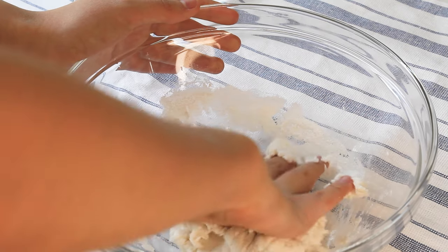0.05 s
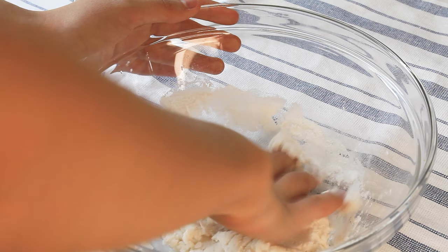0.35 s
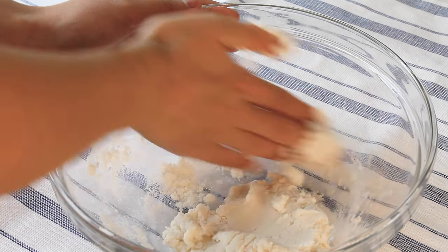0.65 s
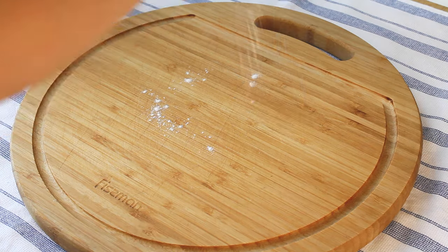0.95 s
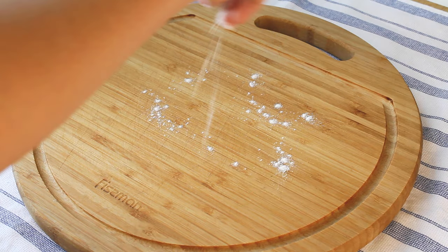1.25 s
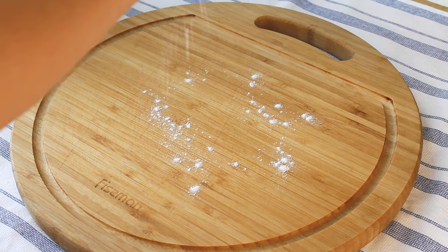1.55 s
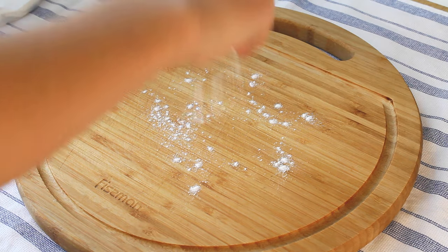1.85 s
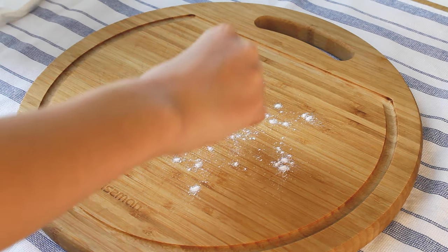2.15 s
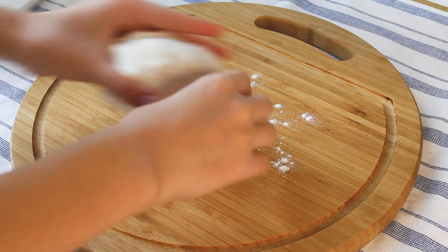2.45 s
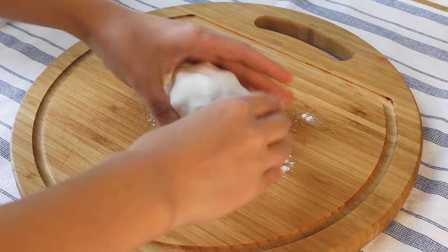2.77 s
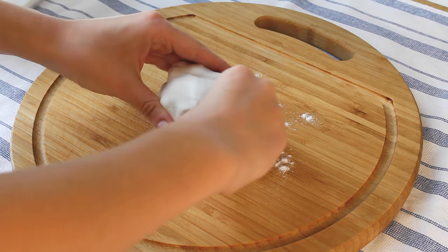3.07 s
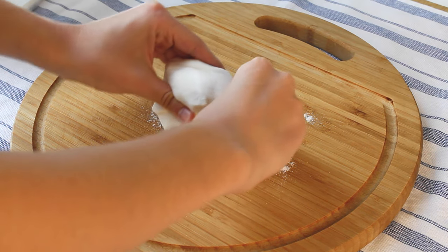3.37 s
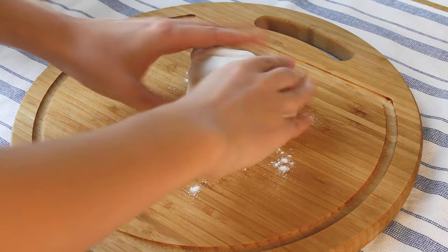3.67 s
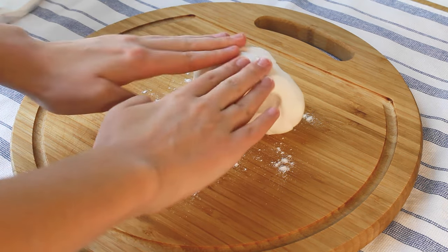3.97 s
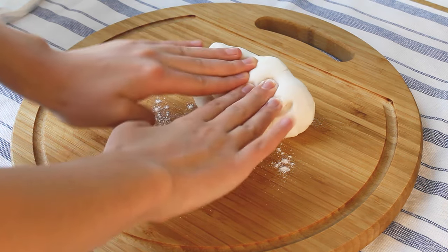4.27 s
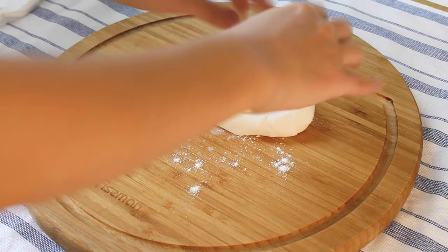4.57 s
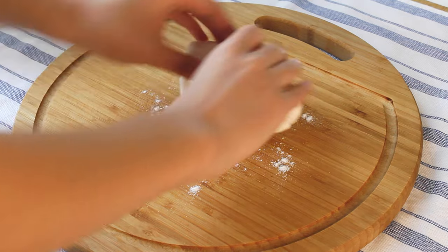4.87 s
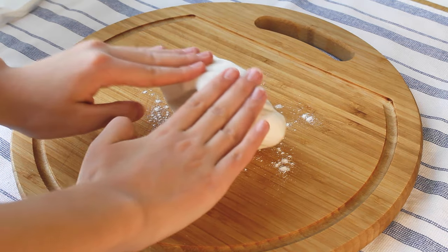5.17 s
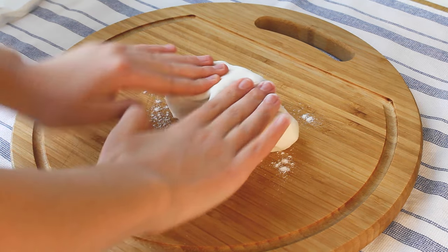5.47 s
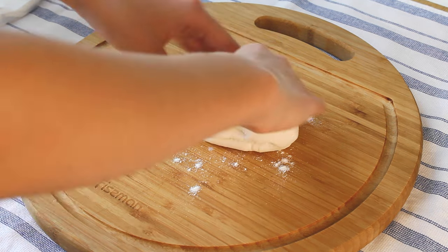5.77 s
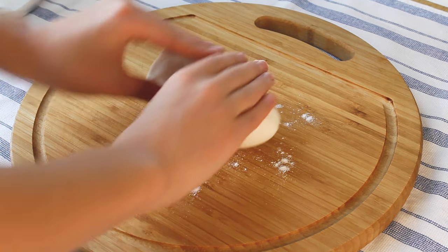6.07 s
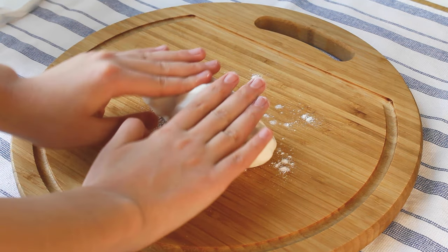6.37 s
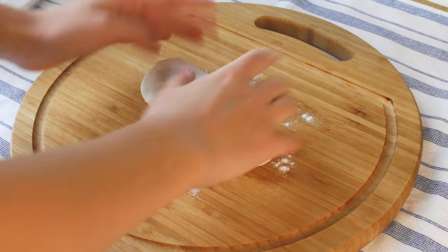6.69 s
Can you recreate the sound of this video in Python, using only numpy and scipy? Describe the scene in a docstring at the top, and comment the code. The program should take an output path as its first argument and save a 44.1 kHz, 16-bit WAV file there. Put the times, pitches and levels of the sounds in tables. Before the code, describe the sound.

A wooden cutting board knocks and rocks against a table as dough is rolled on it by hand, heard close up in a small kitchen. It begins with faint rubbing and pinches of flour, then a crisp knock and a soft plop of dough. Three pushes follow about a second apart, with wooden clatter and dull thuds. Floury palms brush and peel off the dough, ending quietly over a steady hum.

```python
"""In a quiet kitchen, flour is sprinkled on a round wooden board on a cloth-covered table,
then dough is rolled on it by hand. Each push tips the board, so it knocks on the table and chatters.
Arms and dough land with dull thuds, trapping little pockets of air that pop.
Floury palms hiss as they rub and peel off the dough, and a fingertip squeaks faintly.
The walls add a short echo, and the room hums underneath."""
import sys
import numpy as np
from scipy import signal
from scipy.fft import rfft, irfft
from scipy.io import wavfile

SR = 44100
rng = np.random.default_rng(int(sys.argv[2]) if len(sys.argv) > 2 else 0)


def store_wav(level_fs):
    """Save 16-bit WAV to argv[1]."""
    pcm = np.round(np.clip(np.atleast_2d(level_fs), -1, 1) * 32767)
    wavfile.write(sys.argv[1], SR, pcm.T.astype(np.int16))


N = 305613
TIME = np.arange(N) / SR

# The notes the board rings with. A ring time is how long a sound takes to fade by 60 dB.
# pitch_hz, level_db, ring_s
BOARD_NOTES = [(121, -24, .1), (170, -33, .16), (198, -25, .15), (252, -32, .15), (312, -20, .037),
               (377, -30.5, .16), (500, -21, .036), (648, -31, .1), (738, -30, .1), (806, -41, .13),
               (905, -18.5, .042), (1021, -29, .046), (1090, -37, .13), (1174, -21.5, .03),
               (1250, -26.5, .046), (1411, -36, .037), (1595, -33, .033), (1760, -24, .028),
               (2015, -34.5, .042), (2245, -33, .027), (2535, -41, .038), (2665, -38, .035),
               (2980, -41, .04), (3567, -47, .039), (4550, -48, .04)]
def board(bass_hz, smear_hz, smear_width_hz, spot_db, rim_s, rim_share):
    """Every touch rings the same notes in the wood; soft ones are dull, heavy ones add bass."""
    out, click = np.zeros(N), signal.unit_impulse(SR // 4)
    notes = np.array([from_db(db) * ring(click, hz, ring_s) for hz, db, ring_s in BOARD_NOTES])
    touches = contacts()
    # each spot on the board favours other notes
    spots = from_db(spot_db * rng.standard_normal((len(touches), len(BOARD_NOTES))))
    for (s, db, brightness_hz, weight_db, muting), spot in zip(touches, spots):
        wash = table_wash(len(click), db=-34.5, ring_s=0.33, low_hz=163, high_hz=1960)
        knock = cut(spot @ notes + wash, brightness_hz, "low") * from_db(-muting * TIME[:len(click)])
        bass = (from_db(weight_db) - 1) * cut(knock, bass_hz, "low", order=1)
        add(out, s, from_db(db) * (knock + bass))
    # waves cross the wood at unequal speeds, which smears the first crack
    r = np.exp(-np.pi * smear_width_hz / SR)
    smear = [1, -2 * r * np.cos(2 * np.pi * smear_hz / SR), r * r]
    out = signal.lfilter(smear[::-1], smear, out)
    # they bounce back from the rim in a few quick bursts
    loop = np.r_[1, np.zeros(round(rim_s * SR)), -rim_share]
    out = signal.lfilter(loop[::-1], loop, out)
    return cut(out, 82, "high")   # so small a board gives off little deep bass


# Single knocks of the board on the table. Harder is brighter; weight boosts the bass.
# start_s, level_db, brightness_hz, weight_db
KNOCKS = [(2.1728, 1, 2620, -12), (3.2033, -20, 348, 10.5), (3.317, -36, 597, 15.5),
          (4.2512, -14.5, 398, 5.5), (4.359, -18, 513, 8), (4.457, -19.5, 292, 5.5),
          (5.404, -11.5, 763, 4.5), (5.495, -17.5, 450, 7.5)]
# Pushes that tip the board and roll the dough.
# start_s, level_db, weight_db, bounces (rounded), roll_s
PUSHES = [(2.892, 1, -13.5, 3.95, 0.28), (4.1002, 0.5, -4, 2, 0.28), (5.177, -2, 2.5, 1, 0.13)]
def contacts(rock_s=.0392, bounce_loss_db=0.9, muting_db_per_s=500):
    """List every touch of the board: start_s, level_db, brightness_hz, weight_db, muting_db_per_s."""
    ringing = list(KNOCKS)
    for s, db, weight_db, bounces, _ in PUSHES:
        ringing.append((s, db, 1275, weight_db))
        ringing.append((s + 0.037, db - 12.5, 810, 7))   # the far edge comes down
        for k in range(round(bounces)):   # then the board rocks, softly and ever more weakly
            ringing.append((s + .052 + k * rock_s, db - 10 - k * bounce_loss_db, 437, 3))
    # whatever lands stays on the board and mutes it
    muted = [(s, db + 12.5, hz, -25, muting_db_per_s) for s, db, _, _, hz, _ in LANDINGS]
    return [(*touch, 0) for touch in ringing] + muted


def table_wash(size, db, ring_s, low_hz, high_hz):
    """The table top rings with so many notes at once that they blur into fading noise."""
    wash = cut(cut(rng.standard_normal(size), low_hz, "high"), high_hz, "low", order=4)
    return from_db(db) * fade(TIME[:size], ring_s) * rms_one(wash)


# An arm, lump of dough or palm lands flat and traps a pocket of air.
# start_s, level_db, pitch_hz, pocket_open_s, knock_brightness_hz, thud_db
LANDINGS = [(1.5719, -29, 363, .007, 2000, -10), (2.4659, -21, 353, 0.0074, 900, -6.5),
            (3.607, -41.5, 382, .025, 1300, -38)]
def air_pops(brightness_hz, ring_s, choke_db_per_s):
    """The trapped air rings for a moment, until its pocket closes."""
    out, push = np.zeros(N), cut(signal.unit_impulse(SR // 4), brightness_hz, "low")
    for s, db, hz, open_s, *_ in LANDINGS:
        choke = from_db(-choke_db_per_s * np.maximum(TIME[:len(push)] - open_s, 0))
        add(out, s, from_db(db) * choke * ring(push, hz, ring_s))
    return out


# The hands lean on the dough.
# start_s, level_db, last_pitch_hz, ring_s
PRESSES = [(1.854, -24, 51.5, .27), (2.772, -25.5, 55.6, 0.11), (3.312, -29, 45.3, 0.23),
           (3.553, -32, 57.6, 0.29), (4.365, -30, 62, 0.32), (4.624, -28.5, 62, 0.21),
           (5.409, -11.5, 93, 0.04), (5.498, -24.5, 102.5, 0.21), (5.673, -19.5, 57, .1),
           (5.735, -29.5, 59.7, 0.19), (6.301, -27, 52, 0.18), (6.39, -25, 46.3, 0.056)]
def thuds(rise_s, settle_s, sag_ratio, shake_hz, sway_hz, sway_ring_s, sway_db):
    """The table gives under a soft weight: the pitch sinks as it settles, and the top sways on."""
    out, t = np.zeros(N), TIME[:SR // 2]
    loads = [(s + 0.0146, db, 60.6, 32.26, 0.35) for s, *_, db in LANDINGS]
    loads += [(s, db, sag_ratio * hz, hz, ring_s) for s, db, hz, ring_s in PRESSES]
    loads += [(s, -29, sag_ratio * shake_hz, shake_hz, 1) for s, *_ in PUSHES]
    for s, db, first_hz, last_hz, ring_s in loads:
        hz = last_hz + (first_hz - last_hz) * np.exp(-(t / settle_s) ** 2)
        swell = (1 - np.exp(-t / rise_s)) * fade(t, ring_s)
        add(out, s, from_db(db) * swell * np.sin(2 * np.pi * np.cumsum(hz) / SR))
    sway = rms_one(ring(out, sway_hz, sway_ring_s))
    return out + from_db(sway_db) * np.std(out) * sway


def rolling(delay_s=.04, rise_share=0.15):
    """After a push the dough rumbles over the wood; a stronger push rumbles louder."""
    out = np.zeros(N)
    for s, db, *_, roll_s in PUSHES:
        rise_s = rise_share * roll_s
        add(out, s + delay_s, rub(db - 39.5, rise_s, roll_s - rise_s, low_hz=80, high_hz=363, peak_hz=178))
    return out


def scrape(start_s):
    """The dough breaks loose and drags back over the wood, hollow and grainy."""
    out = np.zeros(N)
    add(out, start_s, rub(db=-41.5, rise_s=.012, fall_s=0.073, low_hz=340, high_hz=2600, peak_hz=486))
    return out


# A hand brushes over wood or cloth; the hollow under it colours the sound.
# start_s, length_s, level_db, hollow_hz
BRUSHES = [(0.969, 0.15, -49, 1180), (1.19, 0.4, -57, 1930), (2.521, 0.053, -54.5, 1600),
           (4.735, .13, -60.5, 2260), (5.65, 0.084, -55.5, 2230), (5.712, .11, -52.5, 1700)]
# A palm peels off the dough.
# start_s, rise_s, fall_s, skin_db, flour_db, flour_hiss_hz
PEELS = [(2.357, .022, 0.057, -58, -50.5, 5400), (3.233, 0.044, 0.064, -57, -56, 6770),
         (4.362, 0.056, 0.026, -49.5, -52.5, 7000), (5.405, 0.043, 0.078, -55, -55.5, 11000),
         (6.029, 0.036, 0.08, -56, -60, 6150), (6.262, 0.078, 0.024, -50.5, -56, 6560),
         (6.583, 0.0017, 0.14, -54.5, -52, 4600), (6.895, 0.024, 0.018, -53.5, -64, 4500)]
# Sticky spots snap free.
# start_s, level_db, pitch_hz
TICKS = [(2.378, -43, 1800), (3.2734, -42, 1090), (3.293, -42, 1040), (3.317, -51, 2620),
         (4.4715, -40, 3280), (4.683, -48, 1300), (5.407, -45.5, 2280), (5.452, -64, 2800)]
def skin(brush_rise_share=0.18, tick_spread=1.37):
    """Hands brush, peel off the dough, and tick where they stick."""
    out = np.zeros(N)
    for s, length_s, db, hz in BRUSHES:
        rise_s = brush_rise_share * length_s
        add(out, s, rub(db, rise_s, length_s - rise_s, low_hz=0.22 * hz, high_hz=2.21 * hz, peak_hz=hz))
    for s, rise_s, fall_s, db, *_ in PEELS:
        add(out, s, rub(db, rise_s, fall_s, low_hz=1070, high_hz=4100, peak_hz=1780))
    for s, db, hz in TICKS:
        low_hz, high_hz = hz / tick_spread, hz * tick_spread
        add(out, s, rub(db, rise_s=0.0017, fall_s=.008, low_hz=low_hz, high_hz=high_hz, peak_hz=hz))
    return out


# Fingertips let go of a pinch of flour.
# start_s, level_db
PINCHES = [(0.918, -49.5), (1.126, -52.5), (1.268, -63.5)]
# A floury palm glides over the dough.
# start_s, length_s, level_db, hiss_hz
GLIDES = [(2.002, 0.23, -68, 11000), (2.94, 0.22, -60, 6860), (4.105, 0.21, -67, 10500),
          (4.928, 0.45, -65.5, 9000)]
def flour():
    """Flour hisses between fingertips and under moving palms; each landing blows out a puff."""
    out = np.zeros(N)
    for s, db in PINCHES:
        add(out, s, rub(db, rise_s=.022, fall_s=0.037, low_hz=2980, high_hz=15000, peak_hz=9700))
    for s, db, *_ in LANDINGS:
        puff_db = -35.5 + .5 * db
        add(out, s, rub(puff_db, rise_s=0.004, fall_s=0.034, low_hz=1100, high_hz=10000, peak_hz=2400))
    hisses = [(s, length_s / 2, length_s / 2, db, hz) for s, length_s, db, hz in GLIDES]
    hisses += [(s, rise_s, fall_s, db, hz) for s, rise_s, fall_s, _, db, hz in PEELS]
    for s, rise_s, fall_s, db, hz in hisses:
        add(out, s, rub(db, rise_s, fall_s, low_hz=0.21 * hz, high_hz=2.36 * hz, peak_hz=hz))
    return out


def rub(db, rise_s, fall_s, low_hz, high_hz, peak_hz, snaps_per_s=450):
    """A rub swells and fades; sticky spots snap free, and the hollow under the hand colours it."""
    t = TIME[:SR // 2]
    snaps = (rng.random(len(t)) < snaps_per_s / SR) * rng.standard_normal(len(t))
    grains = friction(len(t), grain_db=3, catch_hz=205) + from_db(-7.5) * rms_one(snaps)
    grains = cut(cut(grains, low_hz, "high"), high_hz, "low", order=3)
    hollow = from_db(2) * resonance(grains, peak_hz, width_hz=peak_hz / 1.9)
    swell = np.interp(t, [0, rise_s, rise_s + fall_s], [0, 1, 0])
    return from_db(db) * swell * rms_one(grains + hollow)


def friction(size, grain_db, catch_hz):
    """Noise whose strength jumps as the flour grains catch and let go."""
    catches = rms_one(cut(rng.standard_normal(size), catch_hz, "low"))
    return rms_one(rng.standard_normal(size) * from_db(grain_db * np.clip(catches, -2, 2)))


# The path of one faint fingertip squeak.
# time_s, pitch_hz, level_db
SQUEAK_PATH = [(5.775, 2880, -80), (5.80, 2840, -59), (5.835, 2790, -59), (5.875, 2700, -72)]
def squeak(waver_hz):
    """Skin sticks and slips fast enough to sing, sinking as the hand slows."""
    s, hz, db = np.transpose(SQUEAK_PATH)
    pitch = np.interp(TIME, s, hz) + waver_hz * rms_one(cut(rng.standard_normal(N), 110, "low"))
    loudness = np.interp(TIME, s, from_db(db), left=0, right=0)
    return loudness * np.sin(2 * np.pi * np.cumsum(pitch) / SR)


# How the sliding of the hands swells and fades between strokes.
# time_s, level_db
SLIDE_LEVELS = [(0.0, -67), (0.96, -65.5), (1.12, -60), (1.23, -61), (1.89, -62), (2.37, -58.5),
                (2.53, -68), (2.76, -63.5), (3.09, -59.5), (3.59, -65.5), (3.99, -60), (4.84, -63.5),
                (5.09, -61), (5.48, -66), (5.69, -61), (5.85, -56.5), (6.29, -62), (6.93, -65)]
# The tone of that sliding, from bass to treble.
# pitch_hz, level_db
SLIDE_TONE = [(30, 2), (70, 3.5), (150, -3.5), (400, -10.5), (600, -21), (900, -32), (1500, -19),
              (3000, -24), (6500, -30.5), (8000, -34), (16000, -38.5)]
def sliding(boost_db):
    """Hands that never quite rest make a faint rubbing noise."""
    db = np.interp(TIME, *np.transpose(SLIDE_LEVELS))
    return from_db(db + boost_db) * coloured(friction(N, grain_db=1.5, catch_hz=119), SLIDE_TONE)


# How long the kitchen echoes, from bass to treble.
# pitch_hz, ring_s
ECHO_TIMES = [(100, 0.62), (400, 0.27), (1500, 0.37), (5000, 0.36), (15000, 0.19)]
def wall_echoes(x, first_echo_s):
    """Sound bounces between the walls, and each octave dies away at its own speed."""
    t, edges = TIME[:SR // 2], np.geomspace(90, 18000, 9)
    tail = 0
    for low, high in zip(edges, edges[1:]):
        ring_s = at_hz(ECHO_TIMES, np.sqrt(low * high))
        tail = tail + fade(t, ring_s) * cut(rng.standard_normal(len(t)), [low, high], "band")
    tail = tail * np.clip(t / first_echo_s - 1, 0, 1)
    return signal.fftconvolve(x, tail / np.sqrt(np.sum(tail ** 2)))[:N]


# The tone of the quiet room, from bass to treble.
# pitch_hz, level_db
ROOM_TONE = [(12, -9), (20, 1.5), (55, 1.5), (81, -16), (163, -24), (198, -5), (270, -15.5), (301, -11.5),
             (357, -34), (558, -26.5), (718, -24), (923, -21.5), (2140, -36.5), (3950, -38.5), (16000, -46)]
def room_noise(level_db):
    """The room rumbles and hisses steadily, with a low drone in it."""
    return from_db(level_db) * coloured(rng.standard_normal(N), ROOM_TONE)


def from_db(db):
    """Turn decibels into a number to multiply by."""
    return 10 ** (np.asarray(db) / 20)


def rms_one(x):
    """Scale a sound to an average power of 1."""
    return x / np.sqrt(np.mean(x ** 2) + 1e-20)


def fade(t, ring_s):
    """A curve that falls by 60 dB every ring_s."""
    return np.exp(-np.log(1000) * t / ring_s)


def at_hz(points, hz):
    """Read between a table's rows, with octaves evenly spaced."""
    pitches, values = np.transpose(points)
    return np.interp(np.log(np.maximum(hz, 1)), np.log(pitches), values)


def cut(x, hz, keep, order=2):
    """Keep the "low" side of hz, the "high" side, or the "band" between two pitches."""
    edge = np.clip(hz, 10, .45 * SR)
    return signal.sosfilt(signal.butter(order, edge, keep, fs=SR, output="sos"), x + 1e-18)


def ring(x, hz, ring_s):
    """Each click in x starts a pure note that fades."""
    r, w = from_db(-60 / (ring_s * SR)), 2 * np.pi * hz / SR
    return signal.lfilter([0, np.sin(w)], [1, -2 * r * np.cos(w), r * r], x + 1e-18)


def resonance(x, hz, width_hz):
    """Let through the sound near one pitch."""
    r = np.exp(-np.pi * width_hz / SR)
    feedback = [1, -2 * r * np.cos(2 * np.pi * hz / SR), r * r]
    return signal.lfilter(np.array([1, 0, -1]) * (1 - r * r) / 2, feedback, x)


def coloured(x, tone):
    """Shape noise with a tone table, at an average power of 1."""
    gains = from_db(at_hz(tone, np.fft.rfftfreq(N, 1 / SR)))
    return rms_one(irfft(rfft(x) * gains, N))


def add(out, start_s, sound):
    """Mix a sound in at its start time."""
    start = max(round(start_s * SR), 0)
    out[start:start + len(sound)] += sound[:max(N - start, 0)]


def scene():
    """Board, table and hands close by, in a small room."""
    wood = from_db(0.25) * board(bass_hz=456, smear_hz=1090, smear_width_hz=960, spot_db=3.0,
                                 rim_s=0.001415, rim_share=0.54)
    pops = air_pops(brightness_hz=910, ring_s=.11, choke_db_per_s=2200)
    table = thuds(rise_s=0.0018, settle_s=0.0228, sag_ratio=1.13, shake_hz=34.3,
                  sway_hz=30.0, sway_ring_s=0.78, sway_db=-8)
    hands = from_db(1.0) * (flour() + rolling() + skin() + scrape(start_s=5.855)) + squeak(waver_hz=11)
    to_walls = from_db(-12.5) * wood + from_db(-14.0) * hands + from_db(-13.5) * (pops + table)
    echoes = wall_echoes(to_walls, first_echo_s=0.0077)
    background = sliding(boost_db=10) + room_noise(level_db=-49.13)
    return (wood + pops + table + hands + echoes + background)[None]


def record(dry):
    """Trim away the deepest rumble and the highest hiss."""
    treble_cut = signal.cheby2(16, 70, 16400, fs=SR, output="sos")
    return signal.sosfilt(treble_cut, cut(dry, 16, "high"))


dry = scene()
out = record(dry)
store_wav(out)
```